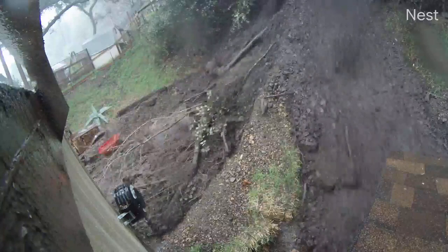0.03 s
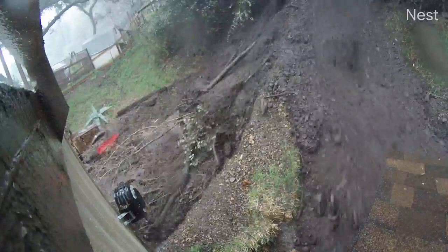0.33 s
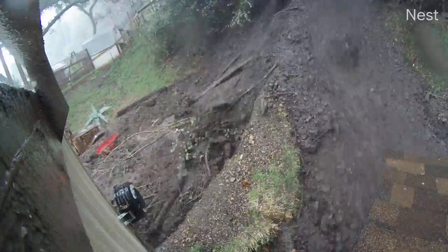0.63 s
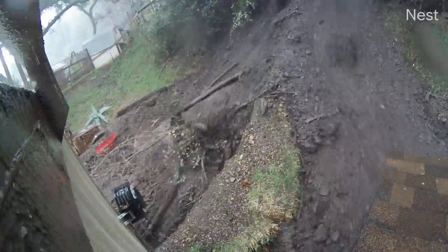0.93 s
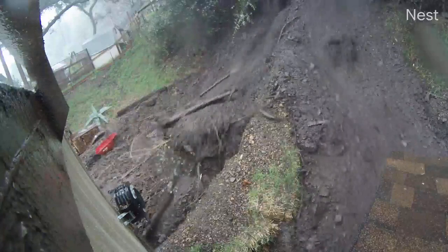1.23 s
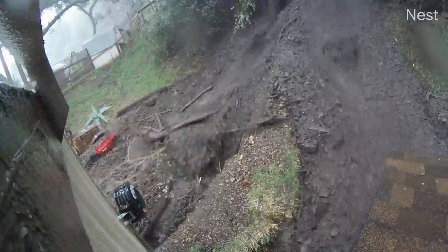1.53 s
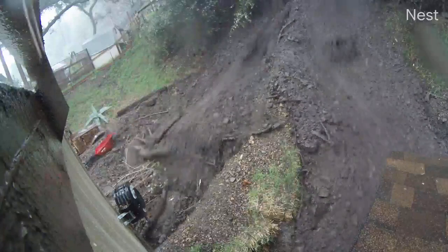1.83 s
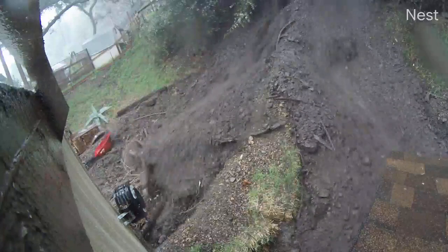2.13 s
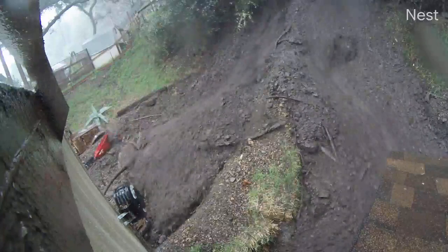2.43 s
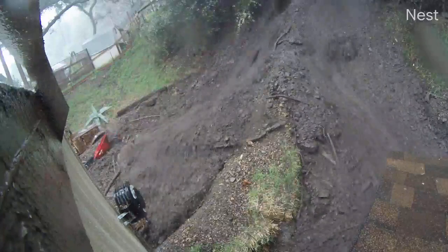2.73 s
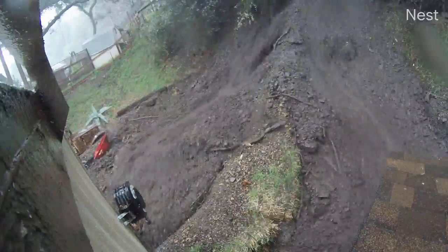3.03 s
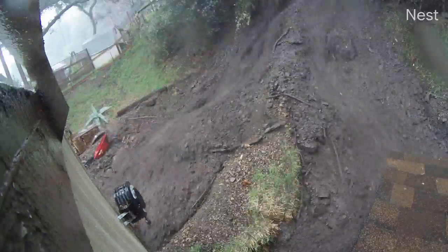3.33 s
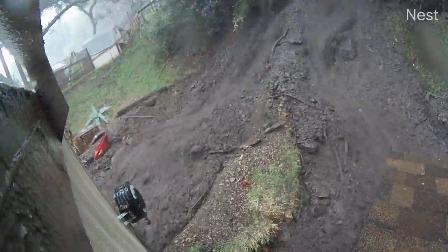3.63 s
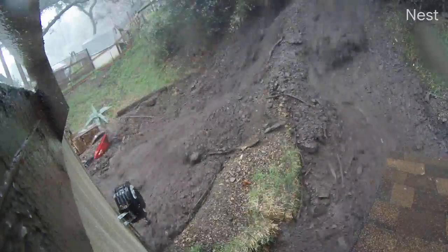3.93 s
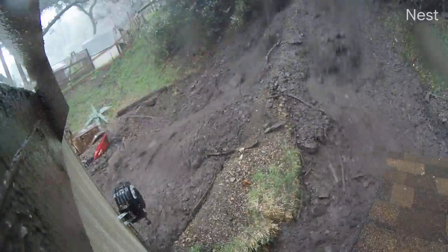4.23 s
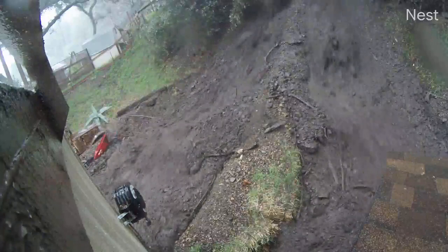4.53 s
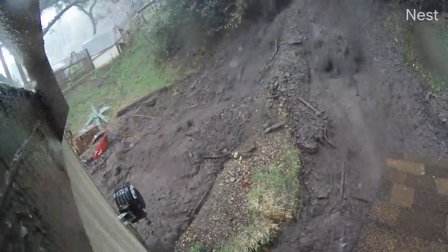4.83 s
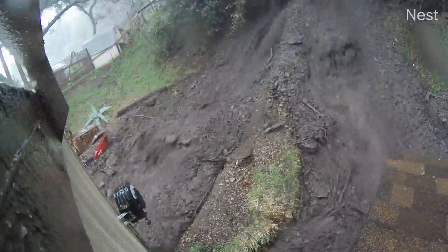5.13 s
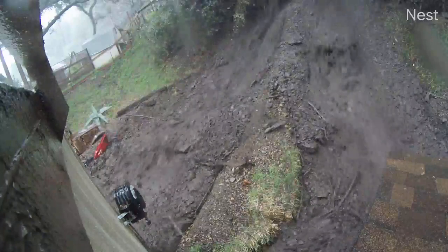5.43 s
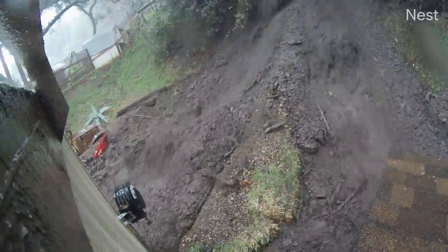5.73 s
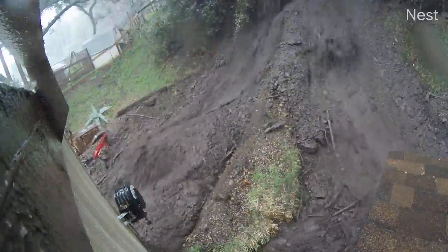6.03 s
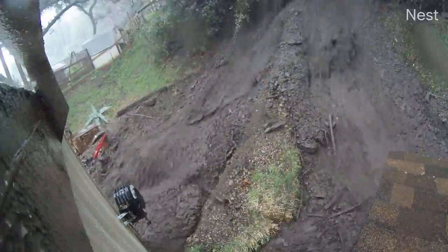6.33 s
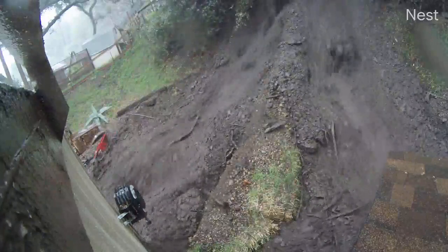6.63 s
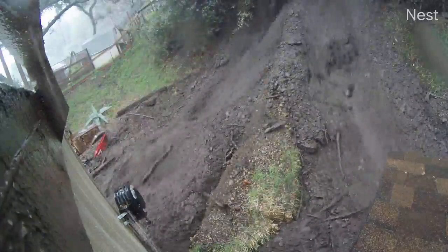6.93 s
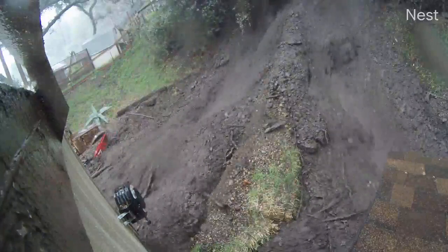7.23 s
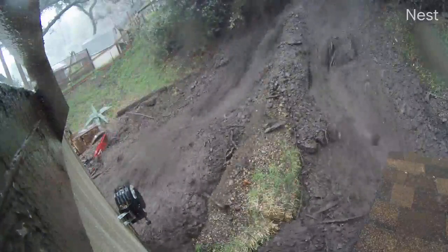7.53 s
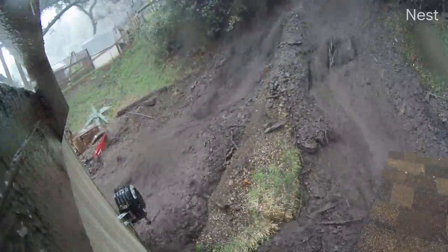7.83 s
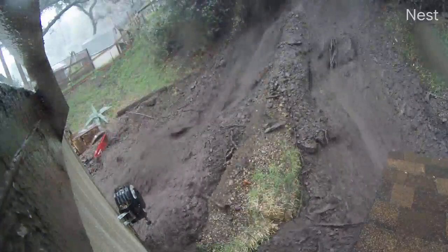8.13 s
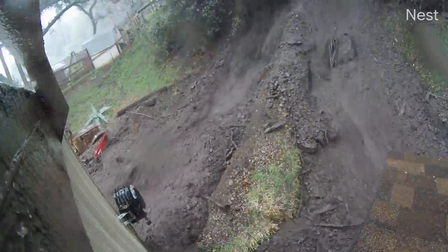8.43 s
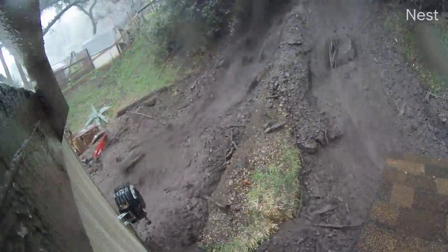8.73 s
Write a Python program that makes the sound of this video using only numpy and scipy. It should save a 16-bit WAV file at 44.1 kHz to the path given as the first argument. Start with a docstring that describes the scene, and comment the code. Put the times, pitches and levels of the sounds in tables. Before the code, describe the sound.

A mudslide pours down a garden slope without pause. Thick wet earth churns and bubbles while grit hisses and small stones chatter on top, swelling and easing slightly. Scattered through the rush are clods slapping, heavy lumps thudding, brief sloshes, pebble rattles and twig crunches, over a very faint rumble. A security camera microphone a few metres away makes it hollow and narrow.

```python
"""Mudslide in a garden

Wet earth pours down a slope a few metres below a security camera on a house wall. Tumbling lumps
churn, trapped air plops, grit and twigs hiss on top and stones chatter. Clods slap, heavy lumps
thud, slurry sloshes and twigs crunch over a faint rumble. The camera's small housing makes it
all hollow and narrow."""
import sys
import numpy as np
from scipy import signal
from scipy.fft import rfft, irfft
from scipy.io import wavfile
from scipy.ndimage import uniform_filter1d, map_coordinates

SR = 44100
rng = np.random.default_rng(int(sys.argv[2]) if len(sys.argv) > 2 else 0)


def wrap_up_sound(samples):
    """Save the sound to the file named by the first command line argument, as 16-bit audio."""
    columns = np.atleast_2d(samples).T
    # keep every value between -1 and 1, then stretch to whole-number steps
    tamed = np.clip(columns, -1, 1)
    steps = np.round(tamed * 32767).astype(np.int16)
    wavfile.write(sys.argv[1], SR, steps)


N = 391166
TIME_S = np.arange(N) / SR
FFT_SIZE = 409600
BIN_HZ = np.maximum(np.arange(FFT_SIZE // 2 + 1) * SR / FFT_SIZE, 1)


def undb(db):
    """Decibels to gain."""
    return 10 ** (np.asarray(db) / 20)


def unit(x):
    """Scale to rms 1."""
    return x / np.sqrt(np.mean(x ** 2))


def colour(x, curve):
    """EQ x along a curve of (freq_hz, gain_db) points."""
    hz, db = np.transpose(curve)
    gain = undb(np.interp(np.log(BIN_HZ), np.log(hz), db))
    return irfft(rfft(x, FFT_SIZE) * gain)[:N]


def waver(per_s, depth_db):
    """A gain that glides between random levels."""
    levels_db = depth_db * rng.standard_normal(4096)
    return undb(np.interp(TIME_S * per_s, np.arange(len(levels_db)), levels_db))


def grains(per_s, spread_db):
    """Tiny collisions of mixed sizes at random moments."""
    hits = rng.random(N) < per_s / SR
    polarity = np.sign(rng.standard_normal(N))
    return unit(hits * polarity * undb(spread_db * rng.random(N)))


def bursts(cues, attack_s):
    """Envelope of blows: each has a fast attack and falls 60 dB over its decay_s."""
    envelope, age = np.zeros(N), np.arange(SR // 2) / SR
    for start_s, level_db, decay_s in cues:
        shape = undb(level_db - 60 * age / decay_s) * (1 - np.exp(-age / attack_s))
        first = int(start_s * SR)
        envelope[first:first + len(age)] += shape[:N - first]
    return envelope


def arch(middle_s, length_s):
    """A half-cosine fade up and back down."""
    return np.cos(np.pi * np.clip((TIME_S - middle_s) / length_s, -.5, .5))


# Thick midrange of wet earth: freq_hz, gain_db
MUD_EQ = [(120, -72.5), (175, -26), (225, -10), (300, -3), (500, 3.3), (800, 3.5), (1100, 3), (1500, 6.5),
          (2200, 0.5), (3500, -10), (7000, -37)]
def mud():
    """Countless wet lumps shear and tumble; the mass heaves unevenly."""
    return unit(colour(grains(per_s=14000, spread_db=10.5), MUD_EQ) * waver(per_s=35, depth_db=.59))


# Tone of the bubbling: freq_hz, gain_db
BUBBLE_EQ = [(200, -55), (500, -7), (1000, 1.5), (2000, 8), (4000, -14)]
def bubbles(low_hz, high_hz, decay_cycles, spread_db, count, size=4096):
    """Pockets of trapped air burst in the slurry, each a short ringing plop."""
    plops, age = np.zeros(N + size), np.arange(size) / SR
    for when, pitch, strength in rng.random((count, 3)):
        hz = low_hz * (high_hz / low_hz) ** pitch
        ring = np.exp(-age * hz / decay_cycles) * np.sin(2 * np.pi * hz * age)
        first = int(when * N)
        plops[first:first + size] += undb(spread_db * strength ** 2) * ring  # few are loud
    return colour(unit(plops[:N]), BUBBLE_EQ)


# Bright scrape of sand and twigs: freq_hz, gain_db
GRIT_EQ = [(800, -41), (1800, -7.5), (2400, -4.5), (3100, 2.5), (3900, 3), (4600, -5.5), (5300, -2.5),
           (6100, -5.5), (6700, -8), (7400, -16)]
def grit():
    """Sand and twigs scrape along on top, a dense hiss in short clumps."""
    return unit(colour(grains(per_s=14000, spread_db=9.5), GRIT_EQ) * waver(per_s=70, depth_db=.466))


# Narrow, high click of small stones: freq_hz, gain_db
PEBBLE_EQ = [(800, -65.5), (2500, -35), (3700, -8), (4300, -1), (4750, 3), (5150, -7), (6500, -28)]
def pebbles():
    """Small stones chatter against each other in quick clusters."""
    clusters = waver(per_s=200, depth_db=.708)
    return unit(colour(grains(per_s=6000, spread_db=13.5), PEBBLE_EQ) * clusters)


def flicker(x, from_hz, full_hz, depth_db, width_hz, hold_s):
    """Narrow bands swell and sink, most in the treble, while their neighbourhood stays level."""
    hz, frame_s, spectrum = signal.stft(x, SR, nperseg=4096)
    cells = np.meshgrid(hz / width_hz, frame_s / hold_s, indexing="ij")
    swing = map_coordinates(rng.standard_normal((1024, 256)), cells, order=0, mode="wrap")
    band_depth_db = depth_db * np.clip((hz - from_hz) / (full_hz - from_hz), 0, 1)
    gain = undb(band_depth_db[:, None] * np.minimum(swing, .5))  # dips go deeper than swells go high
    gain /= np.sqrt(uniform_filter1d(gain ** 2, 21, axis=0) + 1e-12)
    return signal.istft(spectrum * gain, SR, nperseg=4096)[1][:N]


# Fader rides for the strength of the flow, ahead of each layer's trim: time_s, churn_db, slide_db
FLOW_RIDES = [(0, -42, -40.5), (1.1, -43.5, -42), (2.95, -44.8, -41.5), (3.8, -42, -39.5), (5.5, -43, -39),
              (7.0, -43.8, -40), (8.0, -43, -40), (8.87, -44, -39.5)]
# Heavier loads that swell and pass: middle_s, length_s, mud_gain_db, grit_gain_db, pebble_gain_db
LOAD_SURGES = [(.33, 0.68, 0.5, -0.5, 2.5), (1.48, .3, 1, 2.7, .5), (1.92, 0.56, 0, 2.5, .5),
               (2.52, 0.39, 2.5, 0.8, 2), (3.42, 0.64, 1, 0, 2), (3.98, .41, -1, 0.8, 1),
               (5.45, 1, 0.5, .3, -2), (6.55, .36, 0, -0.5, -1.5), (7.95, .58, -1, 0, 3)]
def flow():
    """The bed: bubbling mud churns while grit and pebbles slide on top, all surging with the load."""
    time_s, *rides_db = np.transpose(FLOW_RIDES)
    churn, slide = [undb(np.interp(TIME_S, time_s, ride)) for ride in rides_db]
    surges_db = sum(np.outer(gains_db, arch(middle_s, length_s) ** 2)
                    for middle_s, length_s, *gains_db in LOAD_SURGES)
    mud_surge, grit_surge, pebble_surge = undb(surges_db)
    popping = bubbles(low_hz=749, high_hz=1800, decay_cycles=5.5, spread_db=11.5, count=1000)
    slurry = (undb(-1.9) * mud() + undb(-12.5) * popping) * churn * mud_surge
    slurry *= waver(per_s=8, depth_db=.59)  # the mud feeds unevenly
    hiss = undb(-1) * grit() * slide * grit_surge
    chatter = undb(-8.5 + .31 * TIME_S) * pebbles() * slide * pebble_surge  # the flow grows stonier
    return slurry + hiss + chatter


# Clods landing: start_s, level_db, decay_s
CLOD_CUES = [(.030, -40, 0.065), (.218, -38, 0.14), (.305, -41, .06), (.412, -35, .06), (1.410, -38.5, .07),
             (1.485, -44, 0.042), (1.798, -32.5, .045), (1.915, -37, .06), (2.486, -36, .04),
             (3.313, -39, .06), (4.675, -41, 0.045), (4.812, -42, 0.033), (7.654, -44, .05),
             (8.076, -39, .05), (8.450, -41, .05)]
def clod_slaps():
    """Clods slap down, each a sharp burst of wet earth."""
    return mud() * bursts(CLOD_CUES, attack_s=.0012)


# Dull body of a heavy lump: freq_hz, gain_db
THUD_EQ = [(150, -29.5), (300, 3), (550, 5.5), (800, 0.5), (1500, -33.5)]
# Heavy lumps landing: start_s, level_db, decay_s
THUD_CUES = [(.06, -42.5, .15), (.11, -42, 0.16), (2.018, -45, 0.059), (2.396, -44, .06),
             (4.310, -41, 0.11), (5.169, -40, 0.065), (5.801, -46, .06), (6.047, -42, 0.082),
             (7.491, -41, .06), (8.332, -43, .06)]
def lump_thuds():
    """Heavy lumps land with a dull thud."""
    body = unit(colour(grains(per_s=8000, spread_db=5.5), THUD_EQ))
    return body * bursts(THUD_CUES, attack_s=.0021)


# Low end of the rumble: freq_hz, gain_db
RUMBLE_EQ = [(20, -19.5), (40, -10.5), (70, 10), (130, 2), (200, -6.5), (350, -13.5)]
# Spells of rumble: start_s, length_s, relative_level_db
RUMBLE_CUES = [(0.205, 0.097, -69), (0.39, 0.076, -67), (0.512, 0.07, -73), (0.768, 0.1, -63),
               (0.897, 0.094, -67), (1.049, 0.072, -72), (1.219, 0.103, -72), (1.352, 0.14, -67),
               (1.608, 0.11, -65), (1.79, 0.087, -66), (2.438, 0.12, -69), (2.63, 0.081, -69),
               (2.766, 0.16, -67), (3.34, 0.082, -72), (3.523, 0.081, -72), (3.713, 0.099, -63),
               (3.841, 0.22, -65.5), (4.164, 0.169, -68.5), (4.81, 0.11, -65), (4.942, 0.151, -64),
               (5.122, 0.091, -63), (5.443, 0.18, -63), (5.7, 0.11, -66), (5.844, 0.071, -65),
               (5.962, 0.033, -83), (6, 0.069, -72), (6.082, 0.09, -68), (6.338, 0.082, -66),
               (6.793, 0.18, -64), (7.295, 0.2, -65), (7.49, 0.2, -65.5), (7.77, 0.072, -64),
               (7.944, 0.084, -70), (8.257, 0.15, -66), (8.697, 0.17, -65)]
def rumble(fade_s=.057):
    """A faint low rumble comes and goes in short, uneven spells."""
    spells = np.zeros(N)
    for start_s, length_s, level_db in RUMBLE_CUES:
        inside_s = np.minimum(TIME_S - start_s, start_s + length_s - TIME_S)
        spells += undb(level_db) * np.clip(inside_s / fade_s + .5, 0, 1)
    return unit(colour(rng.standard_normal(N), RUMBLE_EQ)) * spells


def low_bumps(low_hz, high_hz, length_s, count):
    """Faint, soft low bumps come and go at random."""
    bumps = np.zeros(N)
    for when, pitch in rng.random((count, 2)):
        middle_s = when * N / SR
        hz = low_hz + pitch * (high_hz - low_hz)
        bumps += arch(middle_s, length_s) ** 2 * np.sin(2 * np.pi * hz * (TIME_S - middle_s))
    return unit(bumps)


# Hollow midrange of spilling slurry: freq_hz, gain_db
SLOSH_EQ = [(500, -24), (950, -6), (1350, -3), (1750, -3), (2300, -19.5)]
# Spills: middle_s, length_s, level_db
SLOSH_CUES = [(.225, .05, -46), (0.443, 0.11, -44), (0.46, .04, -43), (3.808, .06, -47),
              (6.584, 0.073, -45), (7.81, .06, -45.5), (8.746, 0.052, -46)]
def sloshes():
    """Slurry heaps up and spills over an obstacle in a brief hollow swell."""
    swells = sum(undb(db) * arch(middle_s, length_s) for middle_s, length_s, db in SLOSH_CUES)
    return unit(colour(grains(per_s=9000, spread_db=6), SLOSH_EQ)) * swells


# Spurts of pebbles: start_s, relative_level_db, decay_s
SPURT_CUES = [(.405, -35, 0.083), (1.466, -37, 0.091), (1.815, -36, 0.067), (2.018, -35, .07),
              (2.481, -34, .071), (2.545, -36, .05), (3.394, -36, .06), (4.068, -34.5, .06),
              (4.469, -35, .07), (4.850, -33, 0.044), (5.467, -37, .05), (6.449, -33, .055),
              (7.328, -34, .1), (8.081, -33.5, .1), (8.636, -32, .04), (8.808, -33.5, 0.096)]
def pebble_spurts():
    """Pebbles and a little grit scatter with a brief bright rattle."""
    return unit(pebbles() + undb(-3.5) * grit()) * bursts(SPURT_CUES, attack_s=.0027)


# Twigs giving way: start_s, level_db, decay_s
CRUNCH_CUES = [(.724, -35, .08), (1.526, -37, .06), (2.489, -37, .035), (2.699, -34, .025),
               (4.352, -36, .07), (6.764, -38, .06), (7.152, -35.5, 0.071), (8.451, -35, 0.1)]
def twig_crunches():
    """Twigs crunch, each a short burst of gritty crackle."""
    return grit() * bursts(CRUNCH_CUES, attack_s=.0025)


def scene():
    """Mono mix: the flickering bed, with hits and sloshes on top and a faint low end beneath."""
    bed = flicker(flow(), from_hz=360, full_hz=3900, depth_db=21, width_hz=21, hold_s=.08)
    lows = undb(1.5) * rumble()
    lows += undb(-71.5) * low_bumps(low_hz=130, high_hz=252, length_s=.095, count=60)
    hits = clod_slaps() + lump_thuds() + undb(.5) * pebble_spurts() + twig_crunches()
    return (bed + hits + sloshes() + lows)[None]


# Resonances and notches of the camera housing: centre_hz, width_hz, gain_db
HOUSING_EQ = [(1078, 335, 4.5), (1650, 350, 2), (1986, 410, -4), (4660, 710, 4.5), (5105, 140, -7),
              (6040, 360, 4.5), (6410, 200, -8)]
def record(dry):
    """The housing rings and cancels at a few pitches; the camera cuts the top steeply."""
    housing_db = sum(db / (1 + (2 * (BIN_HZ - hz) / width_hz) ** 2) for hz, width_hz, db in HOUSING_EQ)
    hollow = irfft(rfft(dry, FFT_SIZE) * undb(housing_db))[:, :N]
    high_cut = signal.ellip(14, .2, 80, 7450, fs=SR, output="sos")
    return signal.sosfilt(high_cut, hollow)


dry = scene()
out = record(dry)
wrap_up_sound(out)
```